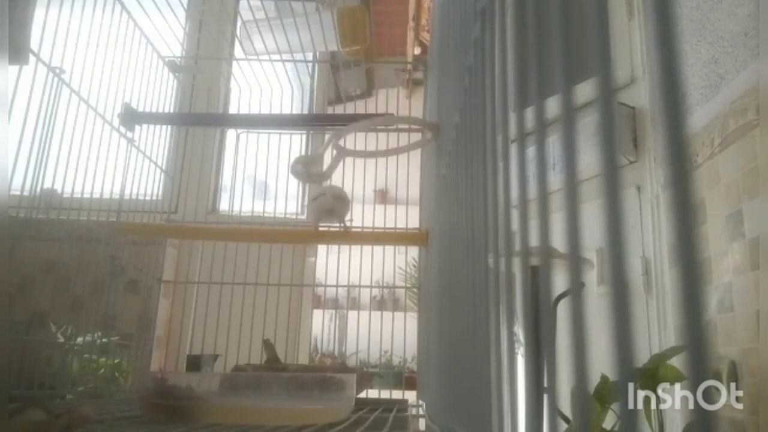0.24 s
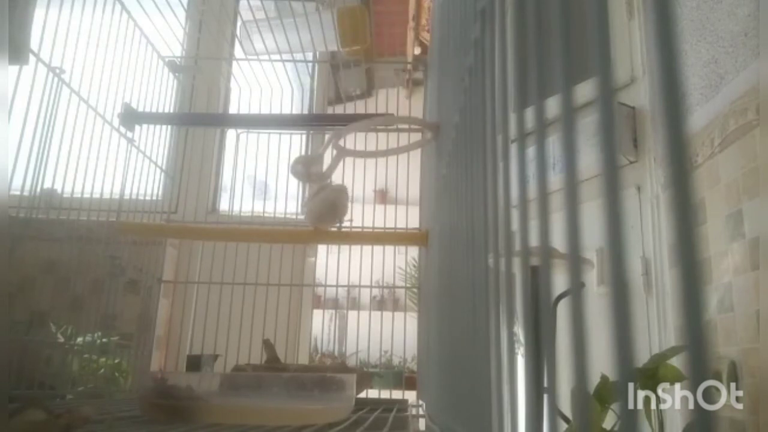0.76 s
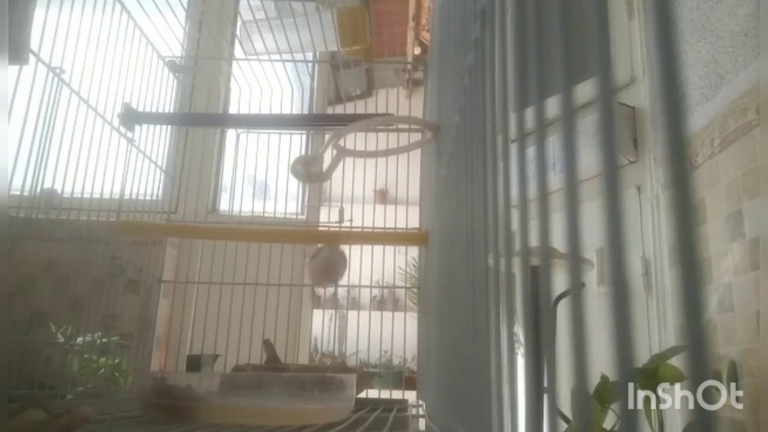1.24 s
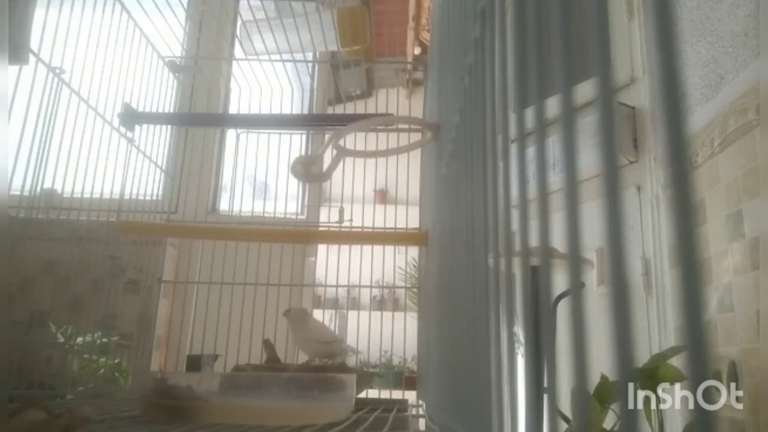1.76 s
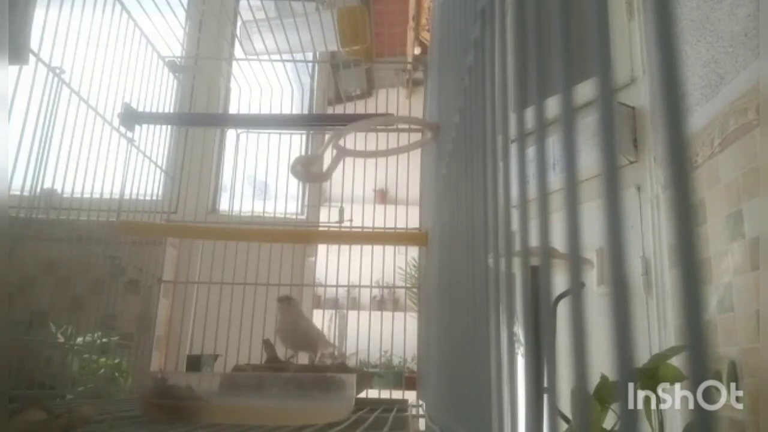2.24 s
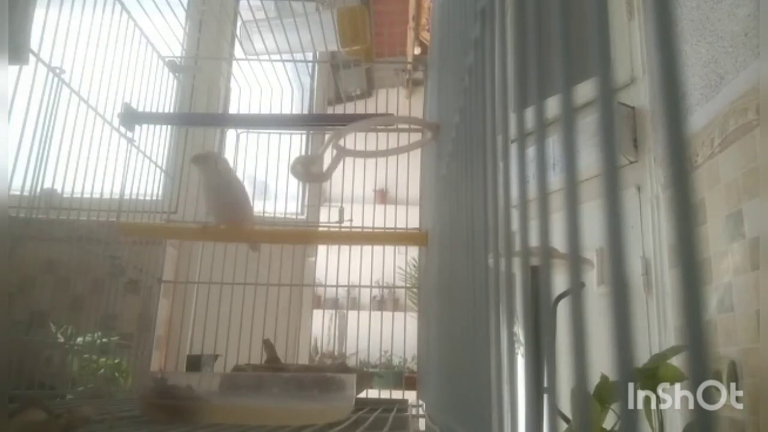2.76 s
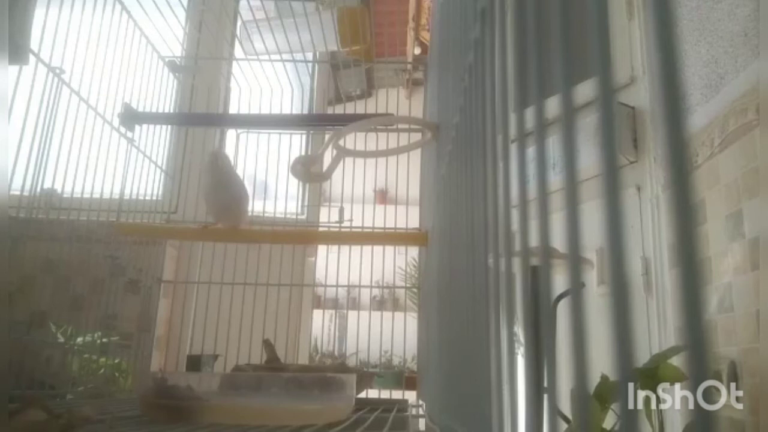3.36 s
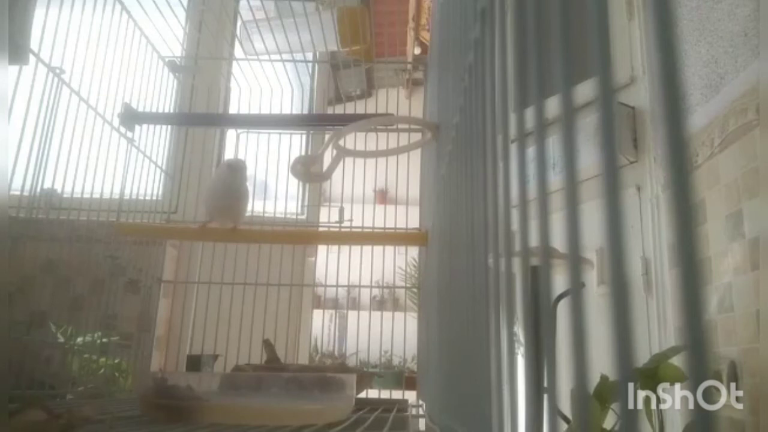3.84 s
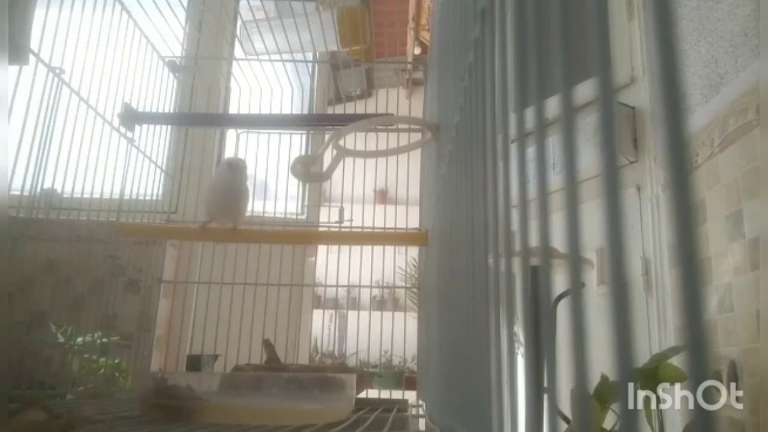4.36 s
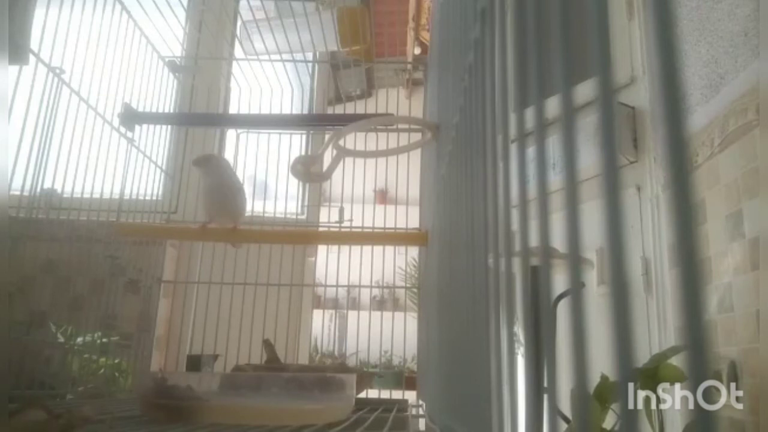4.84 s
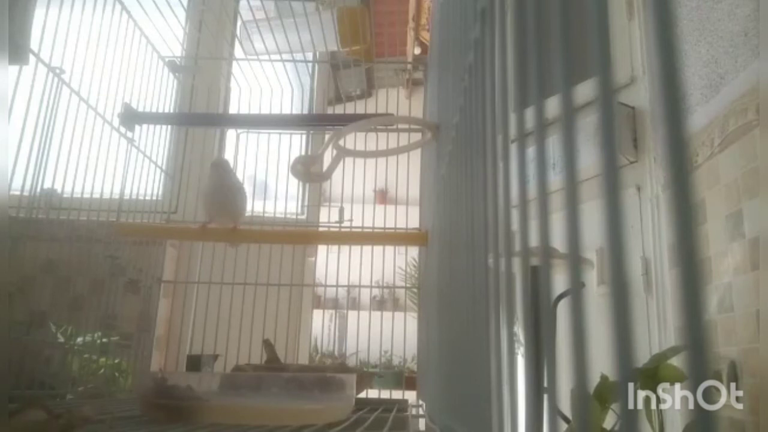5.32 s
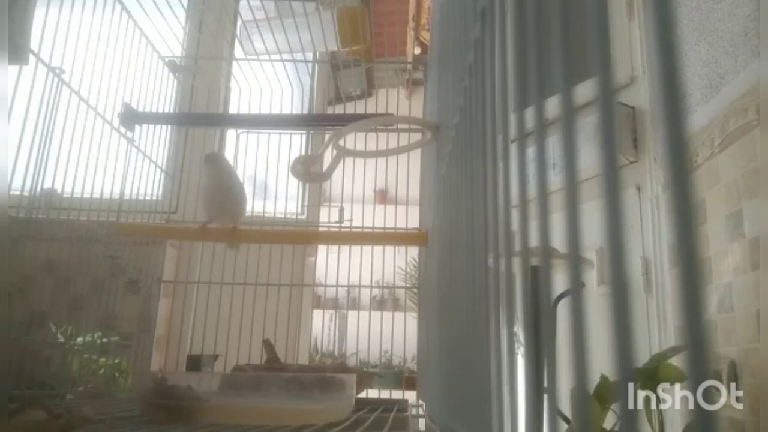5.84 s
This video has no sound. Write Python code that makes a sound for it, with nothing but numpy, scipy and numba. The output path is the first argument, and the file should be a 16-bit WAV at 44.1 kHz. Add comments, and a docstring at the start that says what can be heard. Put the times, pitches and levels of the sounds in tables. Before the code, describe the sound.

A finch in a wire cage gives short, nasal, evenly pitched calls, each about a tenth of a second, with a bright hard-walled echo. Feet and feathers scuff the wires at the start, and around 1.3 seconds it drops with a soft thud onto a tray. It hops again near 2.5, calls once more at 4.4, then mostly quiet. Low rumble swells underneath; the rough recording crackles and drops out.

```python
"""A finch in a wire cage gives short nasal calls: harmonic stacks with a breath of air, coloured by throat and beak.
Its feet and feathers scuff in noise bursts that ring the wires; landings thud through the resonances of the tray.
Under it a low noise rumble swells and lulls over soft air; far birds are faint gliding sines.
Eight linked delay lines make the hard-walled sun room. A coarse converter rounds quiet sound to a few steps,
so the background crackles and drops out."""
import sys
import numpy as np
from scipy import signal
from scipy.fft import rfft, irfft
from scipy.io import wavfile
from scipy.ndimage import uniform_filter1d
from numba import njit

SR = 44100
rng = np.random.default_rng(int(sys.argv[2]) if len(sys.argv) > 2 else 0)


def bounce(signal):
    """Save signal as a 16-bit WAV file at the path given by the first command-line argument."""
    frames = np.transpose(np.atleast_2d(signal))
    limited = np.clip(frames, -1, 1)
    pcm = np.round(limited * 32767).astype(np.int16)
    wavfile.write(sys.argv[1], SR, pcm)


N = 268436
LEAD = SR // 5  # samples of run-up, so that tails already ring at time 0
T = np.arange(-LEAD, N) / SR  # s


def undb(db):
    """Amplitude factor of a level in dB."""
    return 10 ** (np.asarray(db) / 20)


def coloured_noise(colour):
    """Noise of rms 1, its spectrum drawn through (frequency [Hz], level [dB]) points on a log frequency axis."""
    hz, db = np.transpose(colour)
    log_bins = np.log(np.fft.rfftfreq(len(T), 1 / SR) + 1)
    gain = undb(np.interp(log_bins, np.log(hz), db, left=-80))
    x = irfft(rfft(rng.standard_normal(len(T))) * gain, len(T))
    return x / x.std()


def resonate(x, hz, width_hz):
    """Two-pole resonance with gain 1 at its centre."""
    return signal.lfilter(*signal.iirpeak(hz, hz / width_hz, SR), x)


def burst_envelope(events):
    """Sum of quick rises and exponential falls, from (time [s], level [dB], decay constant [s]) events."""
    total = 0
    for start, db, decay in events:
        since = np.abs(T - start)
        total = total + undb(db) * (T > start) * np.exp(-since / decay) * (1 - np.exp(-since / 0.00067))
    return total


def slow_drift(size, length):
    """Random drift of spread 1 that changes over about size samples."""
    x = uniform_filter1d(uniform_filter1d(rng.standard_normal(length), size), size)
    return x * np.sqrt(3 * size / 2)


# Swells of the rumble, before lulls and flutter: (time [s], level [dB])
RUMBLE_SWELLS = [(0, -62), (.28, -59.5), (.32, -51), (.52, -66.5), (.57, -47), (.81, -45.5), (1.1, -68),
                 (1.33, -60), (1.42, -47.5), (1.63, -59), (1.68, -44), (1.98, -73.5), (2.2, -49.5),
                 (2.26, -56.5), (2.6, -72.5), (2.85, -57.5), (3.1, -57), (3.21, -61.5), (3.27, -49.5),
                 (3.45, -68.5), (3.6, -54.5), (3.8, -62), (4.12, -67.5), (4.22, -56), (4.45, -68),
                 (4.6, -56.5), (4.75, -69), (5.12, -58.5), (5.6, -66.5), (5.77, -53.5), (5.98, -57),
                 (6.09, -67)]
# Brief dips of the rumble: (time [s], depth [dB], half length [s])
RUMBLE_LULLS = [(2.951, -27, 0.033), (3.02, -20, 0.034), (3.175, -23.5, 0.041), (3.524, -12, 0.022),
                (3.687, -12.5, 0.037), (4.009, -32, 0.04), (5.017, -25.5, 0.034), (5.147, -13.5, 0.018),
                (5.39, -17.5, .025), (5.709, -22, 0.026), (6.037, -21.5, .03)]
# Colour of the low body: (frequency [Hz], relative level [dB])
RUMBLE_COLOUR = [(20, -26.5), (40, -2.5), (52, -2.5), (62, 4), (75, -6), (150, -18), (200, -25), (400, -47)]
# Colour of the higher layer: (frequency [Hz], relative level [dB])
RUMBLE_UPPER_COLOUR = [(70, -26), (95, 0), (165, -2.5), (200, -28.5), (400, -50.5)]
UPPER_GROWTH, UPPER_JOINS_DB = 1.4, -36  # dB per dB of swell; swell level at which both layers match
FLUTTER_DB, RUMBLE_REST_DB = 2, -72.5  # spread of the unsteadiness; constant bed added to the body


def rumble():
    """Low noise, its own beating evened out so that swells and lulls lead; strong swells reach higher."""
    body = coloured_noise(RUMBLE_COLOUR)
    body = body / np.sqrt(uniform_filter1d(body ** 2, size=2000))
    lull_db = sum(depth * np.clip(1 - np.abs(T - s) / half, 0, 1) for s, depth, half in RUMBLE_LULLS)
    flutter_db = FLUTTER_DB * slow_drift(size=1500, length=len(T))
    db = np.interp(T, *np.transpose(RUMBLE_SWELLS)) + lull_db + flutter_db
    upper_db = UPPER_JOINS_DB + UPPER_GROWTH * (db - UPPER_JOINS_DB)
    upper = coloured_noise(RUMBLE_UPPER_COLOUR) * undb(upper_db)
    return body * (undb(db) + undb(RUMBLE_REST_DB)) + upper


# Colour of the steady air: (frequency [Hz], relative level [dB])
AIR_COLOUR = [(150, 5), (900, -1.5), (3000, -19.5), (6000, -40), (14000, -35.5)]
AIR_DB = -74


def air():
    """Steady soft noise, weighted to the low end."""
    return undb(AIR_DB) * coloured_noise(AIR_COLOUR)


# Level offset at start, end of hold, end of glide, crest and close of a call: (level [dB])
CALL_LEVELS = [-10.5, -2, -0.7, -0.6, -2.5]
# Beak offset at the same five moments: (opening [dB per octave])
CALL_BEAK = [1.5, 2, -0.9, -0.4, -0.57]
START_HZ, HOLD_HZ, GLIDE_END_HZ, CLOSE_HZ = 536.6, 558, 616.3, 611.3  # pitch before sag, flick and waver
HOLD_S, GLIDE_END_S, CREST_SHARE = .0095, .031, .66  # low hold, upward glide, crest as a share of the length


def call_moments(start, length, crest_hz, db, swell_db, beak_db):
    """Time, pitch, level and beak opening at the five moments that shape a call."""
    when = start + np.array([0, HOLD_S, GLIDE_END_S, CREST_SHARE * length, length])
    swell = swell_db * np.clip((when - when[2]) / (when[3] - when[2]), 0, 1)
    pitches = [START_HZ, HOLD_HZ, GLIDE_END_HZ, crest_hz, CLOSE_HZ]
    return when, pitches, db + swell + CALL_LEVELS, beak_db + np.array(CALL_BEAK)


END_SAG, END_FLICK, WAVER = 0.0095, 0.042, 0.0028  # shares of the pitch


def call_pitch(t, when, pitches):
    """Pitch in Hz: holds, glides and holds, wavering; it sags, then flicks up as the call closes."""
    moments = np.arange(len(when))
    place = np.interp(t, when, moments)
    eased = place // 1 + (1 - np.cos(np.pi * (place % 1))) / 2
    hz = np.interp(eased, moments, pitches)
    left = t[-1] - t
    hz = hz * (1 - END_SAG * np.exp(-left / 0.012) + END_FLICK * np.exp(-left / .004))
    waver = uniform_filter1d(rng.standard_normal(len(t)), size=100) * 10
    return hz * (1 + WAVER * waver)


# Throat colour averaged over all directions: (multiple of pitch, relative level [dB])
THROAT_ALL_ROUND = [(1, -27.5), (2, -16), (3, -17.5), (4, -6), (5, -2.5), (6, -1.5), (7, -8), (8, -18.5),
                    (9, -28), (10, -48), (11, -44)]
UPPER_PARTIAL_DB, BREATH_DB = -43.5, -26  # partials 12 to 20 before beak and drift; gain of the breath
LOW_ENTER_S, SECOND_SHARE = 0.034, 0.21  # the lowest two settle; share of that change on the second
SHIFT_DB = 1.8  # spread of the wandering partial balance


def call(row, head_colour):
    """One harmonic stack with a little air once a cycle, as heard directly and as sent round the walls."""
    *shape, low_start_db, walls_db = row
    when, pitches, level_db, beak_db = call_moments(*shape)
    on = (T > when[0] - .001) & (T < when[-1] + .002)
    t = T[on]
    db, beak = np.interp(t, when, level_db), np.interp(t, when, beak_db)
    low_db = low_start_db * np.exp(-((t - t[0]) / LOW_ENTER_S) ** 2)
    shift_db = SHIFT_DB * slow_drift(size=400, length=(21, len(t)))
    phase = 2 * np.pi * np.cumsum(call_pitch(t, when, pitches)) / SR
    partials = np.cos(np.arange(1, 21)[:, None] * phase + rng.uniform(0, 2 * np.pi, (20, 1)))
    breath = resonate(rng.standard_normal(len(t)), 1500, 4900)
    breath = undb(BREATH_DB) * (1 + np.cos(phase)) * breath
    edges = np.clip(np.minimum(t - t[0], t[-1] - t) / .004, 0, 1)
    out = np.zeros((2, len(T)))
    for way, colour in enumerate((head_colour, THROAT_ALL_ROUND)):
        gains = []
        for k, colour_db in list(colour) + [(k, UPPER_PARTIAL_DB) for k in range(12, 21)]:
            tilt_db = beak * np.log2(k / 4)  # an opening beak brightens about the fourth partial
            low_share = (k == 1) + SECOND_SHARE * (k == 2)
            gains.append(undb(colour_db + tilt_db + low_db * low_share + shift_db[k]))
        gains = np.array(gains)
        stack = np.sum(gains * partials, axis=0)
        stack = stack * np.sqrt(2 / np.sum(gains ** 2, axis=0))  # colour leaves the power alone
        out[way, on] = (stack + breath) * undb(db) * edges
    out[1] *= undb(walls_db)
    return out


# Calls: (time [s], length [s], crest pitch [Hz], level [dB], swell towards the crest [dB],
#         beak opening [dB per octave], low partials at the outset [dB], share sent to the walls [dB])
CALLS = [(-.14, .12, 633.5, -25, -2, 1, 2, 0.5), (0.304, 0.11, 627, -28.5, -0.3, 0.7, -8.5, 1.4),
         (0.881, 0.13, 629, -28.5, 2.5, 1, -13.5, 1.46), (1.237, .1, 627.9, -27.5, 0.8, 2, -15.5, 1),
         (1.914, .12, 635.7, -24, 0.6, 1.15, -9, 0), (2.412, 0.095, 622.1, -29, 0.6, 1.04, -1, 0.84),
         (4.44, .12, 636.4, -30, 3.5, 0.94, -1.8, 1.5)]
# Throat colour of each call after the first, as the head turns: (multiple of pitch, relative level [dB])
HEAD_COLOURS = [
    [(1, -26), (2, -12.5), (3, -10), (4, -6), (5, -6), (6, -3), (7, -2.5), (8, -15), (9, -25), (10, -40),
     (11, -52.5)],
    [(1, -25), (2, -14), (3, -8.5), (4, -10.5), (5, -5.5), (6, -2), (7, -13), (8, -16), (9, -54.5),
     (10, -90.5), (11, -54.5)],
    [(1, -20.5), (2, -22.5), (3, -7.5), (4, -2), (5, -11), (6, -9.5), (7, -9), (8, -18.5), (9, -47),
     (10, -45.5), (11, -84)],
    [(1, -19), (2, -9), (3, -10.5), (4, 1.5), (5, -0.5), (6, -12), (7, -11.5), (8, -20), (9, -33),
     (10, -52.5), (11, -55.5)],
    [(1, -18), (2, -5.5), (3, -7.5), (4, -2.5), (5, -4.5), (6, -4), (7, -11.5), (8, -14), (9, -34.5),
     (10, -28.5), (11, -39.5)],
    [(1, -16), (2, -5.5), (3, -9.5), (4, -10), (5, -8.5), (6, -4), (7, -8), (8, -13), (9, -27.5), (10, -31),
     (11, -30)],
]


def finch_calls():
    """All calls, direct and room-bound; the first takes the all-round throat colour."""
    return sum(call(row, colour) for row, colour in zip(CALLS, [THROAT_ALL_ROUND] + HEAD_COLOURS))


@njit
def delay_network(x, lags, gain, damp, leak, follow):
    """Eight delay lines that feed each other, losing treble and bass on every round."""
    line, soft, bass, out = np.zeros((8, 4096)), np.zeros(8), np.zeros(8), np.zeros(len(x))
    for i in range(len(x)):
        total = 0.
        for k in range(8):
            soft[k] += (1 - damp) * (gain[k] * line[k, (i - lags[k]) & 4095] - soft[k])
            bass[k] += follow * (soft[k] - bass[k])
            total += soft[k] - leak[k] * bass[k]
            out[i] += soft[k] * (1 - 2 * (k % 2))
        for k in range(8):
            line[k, i & 4095] = x[i] + soft[k] - leak[k] * bass[k] - total / 4
    return out


ROOM_T60_S, ROOM_DAMP, ROOM_DB = 0.75, 0.1, -15  # decay before treble and bass losses; treble loss; return
GLASS_LEAK, GLASS_HZ = 0.14, 833  # bass share lost per 1000 samples of path, and its corner


def sun_room(x):
    """Echoes from hard walls, whose panes let the bass out."""
    lags = np.array([241, 563, 907, 1361, 1777, 2143, 2579, 2963])  # samples
    gain = undb(-60 * lags / SR / ROOM_T60_S)
    leak = np.clip(GLASS_LEAK * lags / 1000, 0, .9)
    quiet_floor = 1e-18  # keeps the arithmetic out of its slow range
    return undb(ROOM_DB) * delay_network(x + quiet_floor, lags, gain, ROOM_DAMP, leak, 2 * np.pi * GLASS_HZ / SR)


# Feet and feathers on the wires: (time [s], dull scrape [dB], decay constant [s], wire pluck [dB], bright hiss [dB])
SCUFF_EVENTS = [(-.01, -51, .05, -74, -46), (.028, -59, 0.0074, -69, -38), (0.072, -40.5, 0.028, -38, -47),
                (0.089, -53.5, 0.056, -88, -64), (0.106, -61.5, 0.022, -35, -58),
                (.127, -45, 0.033, -47, -65.5), (1.27, -45.5, 0.03, -69.5, -51),
                (1.282, -53, 0.021, -58, -55), (1.335, -45.5, 0.017, -70, -59),
                (1.367, -48, 0.017, -61, -53), (1.417, -55.5, 0.064, -75, -61.5),
                (2.493, -44, 0.0023, -61, -43), (2.55, -56, 0.006, -53.5, -49),
                (2.562, -48.5, 0.026, -39.5, -51), (2.584, -50, 0.045, -70, -70)]
# Colour of the dull scrape: (frequency [Hz], relative level [dB])
SCRAPE_COLOUR = [(500, -28.5), (1000, -8), (2000, -10.5), (4000, -16), (6000, -15), (13000, -40)]
# Colour of the bright quill hiss: (frequency [Hz], relative level [dB])
QUILL_COLOUR = [(2000, -29), (5500, -2.5), (9500, -0.5), (14000, -9.5)]
# Ringing modes of the wires: (frequency [Hz], level [dB], 60 dB decay [s])
WIRE_MODES = [(2060, -3, .04), (4150, -5, .035), (6950, -3, .02), (9260, -14, .025)]
GRIT_DB = 2.5  # spread from tick to tick


def cage_scuffs():
    """Gritty noise bursts of feet and wings, with shorter bursts that set the wires ringing."""
    start, dull_db, decay, wire_db, bright_db = np.transpose(SCUFF_EVENTS)
    tick_levels = undb(GRIT_DB * rng.standard_normal(len(T) // 64 + 1))
    grit = np.repeat(tick_levels, 64)[:len(T)]  # separate claw and quill ticks
    dull = coloured_noise(SCRAPE_COLOUR) * burst_envelope(zip(start, dull_db, decay))
    bright = coloured_noise(QUILL_COLOUR) * burst_envelope(zip(start, bright_db, decay))
    pluck = rng.standard_normal(len(T)) * burst_envelope(zip(start, wire_db, decay / 2))
    wires = 0
    for hz, db, t60 in WIRE_MODES:
        narrow_gain = np.sqrt(t60 * SR / np.log(1000))  # makes up for the narrow band
        wires = wires + undb(db) * narrow_gain * resonate(pluck, hz, np.log(1000) / np.pi / t60)
    return grit * (dull + bright) + wires


# Landings in the tray: (time [s], level before the drive [dB], decay constant [s])
LANDINGS = [(.06, -49.5, 0.021), (1.365, -34.5, 0.06), (1.47, -53.5, 0.028), (1.67, -54.5, 0.036),
            (1.73, -43, 0.07), (2.37, -50.5, 0.013)]
# Tray modes: (frequency [Hz], half the width of each resonance in the pair [Hz], level [dB])
TRAY_MODES = [(136.9, 31, -12), (285, 100, 0), (627, 65, -24.5), (786, 18, -27), (1120, 43, -16)]


def tray_thuds():
    """Noise pushes through the tray's modes, each a pair of resonances in series."""
    push = 8 * rng.standard_normal(len(T)) * burst_envelope(LANDINGS)
    thuds = 0
    for hz, half_width, db in TRAY_MODES:
        once = resonate(push, hz, 2 * half_width)
        thuds = thuds + undb(db) * resonate(once, hz, 2 * half_width)
    return thuds


# Far birds: (time [s], length [s], start pitch [Hz], end pitch [Hz], level [dB])
FAR_CHIRPS = [(1.809, 0.1, 2896, 2884, -55), (4.054, 0.16, 3940, 3696, -67),
              (4.066, 0.16, 1560, 1545, -64.5), (5.192, 0.082, 1370, 1328, -67.5),
              (5.191, 0.061, 2740, 2723, -80), (5.277, 0.03, 2800, 2780, -67.5),
              (5.344, 0.039, 2850, 2797, -71)]


def far_birds():
    """Faint whistles: gliding sines under half-sine swells, slightly unsteady in level."""
    out = 0
    for start, length, hz, end_hz, db in FAR_CHIRPS:
        progress = np.clip((T - start) / length, 0, 1)
        phase = 2 * np.pi * np.cumsum(hz + (end_hz - hz) * progress) / SR
        out = out + undb(db) * np.sin(np.pi * progress) * np.sin(phase)
    return out * (1 + .4 * coloured_noise([(1, 0), (60, 0), (200, -30), (400, -80)]))


CAGE_SEND_DB, CAGE_SEND_HZ = -2.5, 4300  # the cage's treble is lost before the walls


def scene():
    """Mix the direct sounds, their echoes, the rumble and the air; drop the run-up."""
    direct, around = finch_calls()
    hops = cage_scuffs() + tray_thuds()
    far = far_birds()
    send_filter = signal.butter(2, CAGE_SEND_HZ, fs=SR, output="sos")
    cage_send = undb(CAGE_SEND_DB) * signal.sosfilt(send_filter, hops)
    room = sun_room(around + far + cage_send)
    return (direct + far + hops + room + rumble() + air())[None, LEAD:]


STEP_TOP_DB, STEP_BELOW_DB, STEP_FALL_DB_S = -50.5, 20, 4.8  # widest step; step below sound; narrowing per s
ROUND_UP, HISS_DB = .42, -85  # share of a step added before rounding down; hiss before the treble shelf
TREBLE_HZ, TREBLE_DB, TOP_HZ = 3870, -11, 13250  # shelf corner and gain; top cut


def record(dry):
    """The converter's steps widen with loud sound and narrow slowly after it; then treble shelf and top cut."""
    t = np.arange(N) / SR
    loud_db = 10 * np.log10(uniform_filter1d(dry ** 2, size=1000) + 1e-12)
    want_db = np.minimum(loud_db - STEP_BELOW_DB, STEP_TOP_DB)
    want_db[:, 0] = STEP_TOP_DB  # starts at the widest step
    fall_db = STEP_FALL_DB_S * t
    step = undb(np.maximum.accumulate(want_db + fall_db, axis=1) - fall_db)
    x = step * np.sign(dry) * np.floor(np.abs(dry) / step + ROUND_UP)
    x = x + undb(HISS_DB) * rng.standard_normal(dry.shape)  # a trace of hiss stays in the gaps
    low = signal.sosfiltfilt(signal.butter(3, TREBLE_HZ, fs=SR, output="sos"), x)
    x = low + undb(TREBLE_DB) * (x - low)
    return signal.sosfilt(signal.ellip(8, .2, 70, TOP_HZ, fs=SR, output="sos"), x)


dry = scene()
out = record(dry)
bounce(out)
```